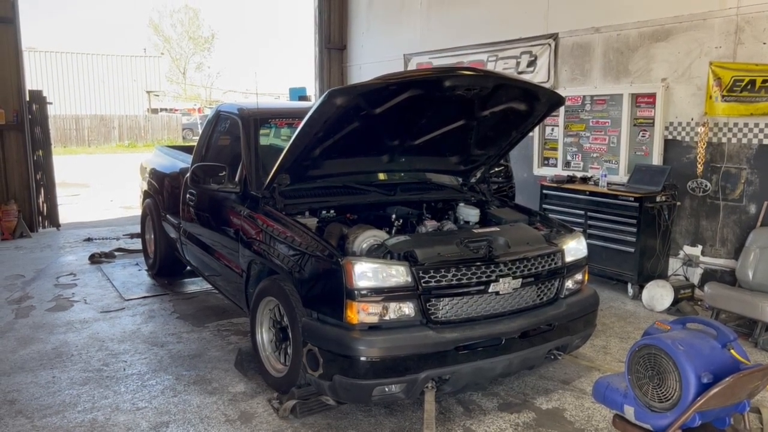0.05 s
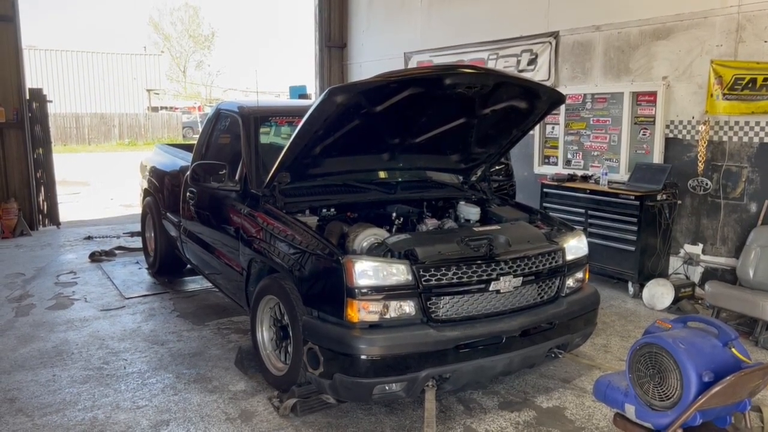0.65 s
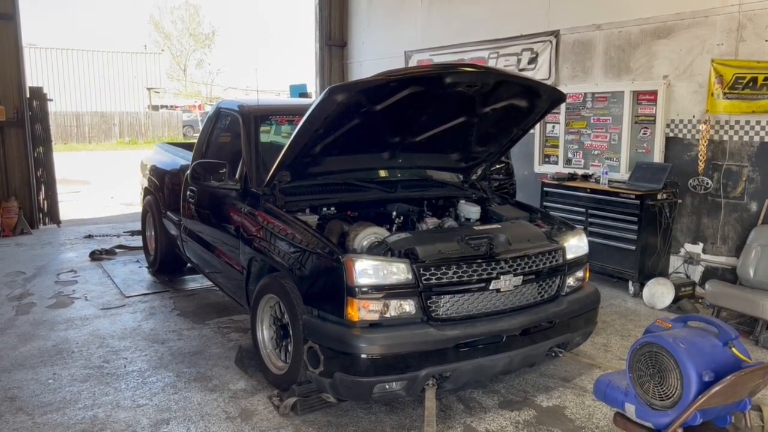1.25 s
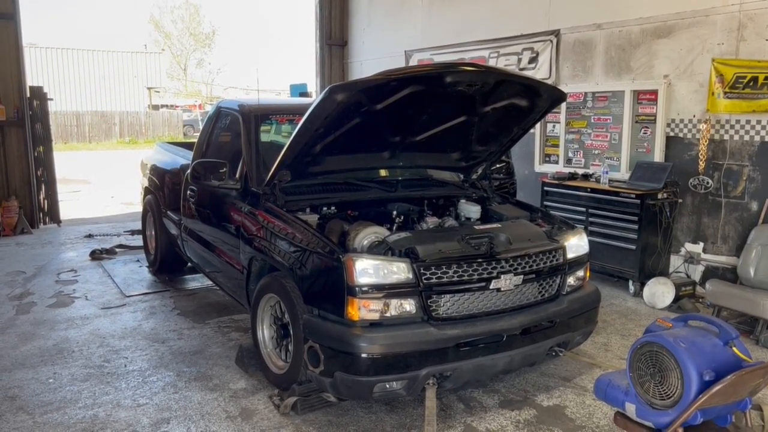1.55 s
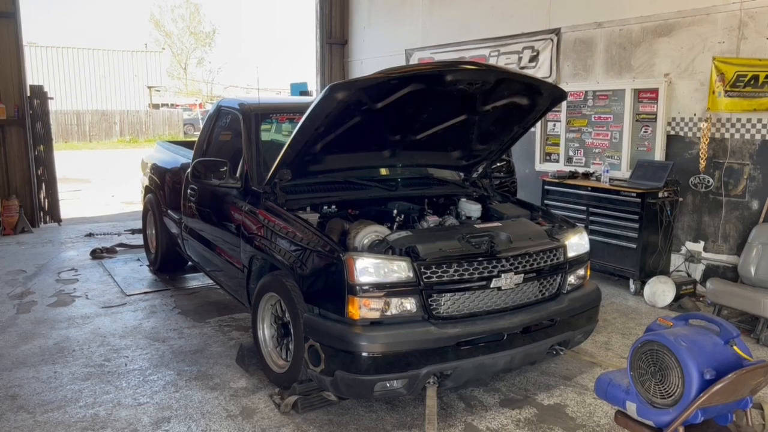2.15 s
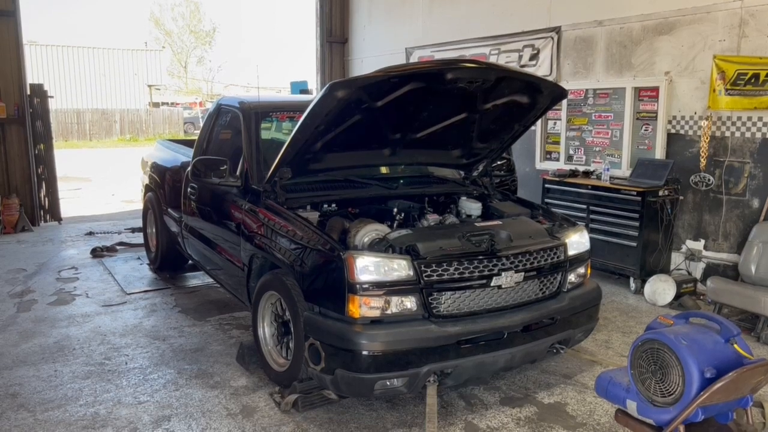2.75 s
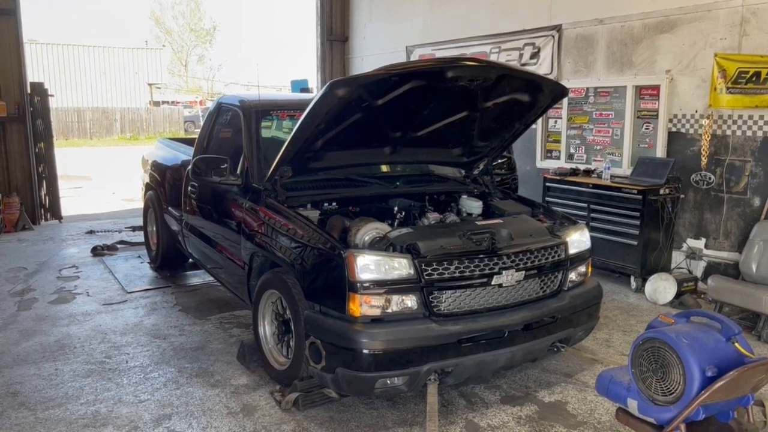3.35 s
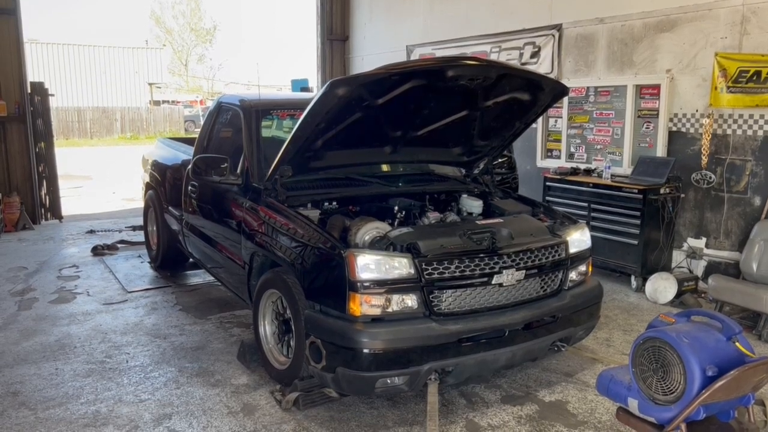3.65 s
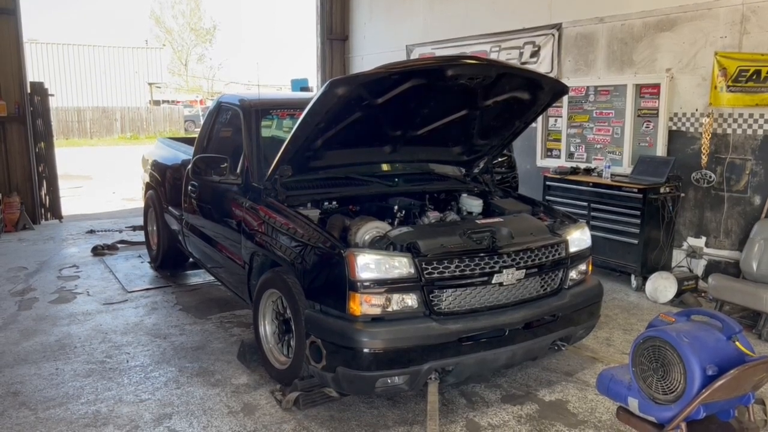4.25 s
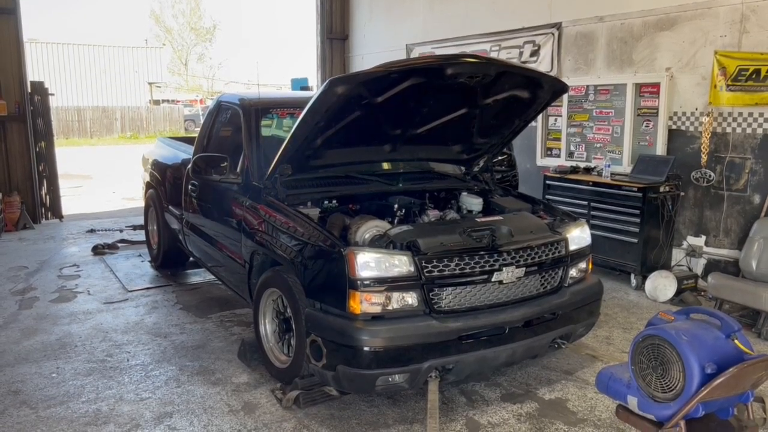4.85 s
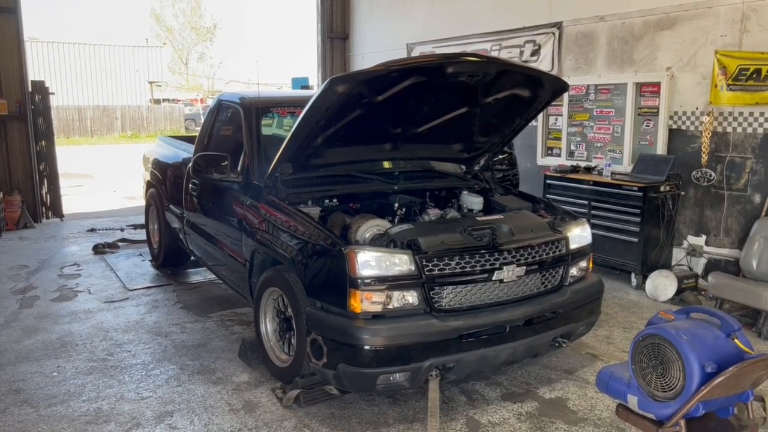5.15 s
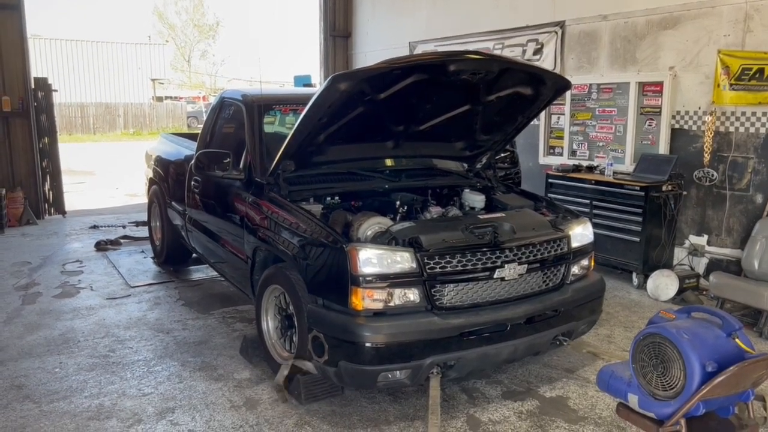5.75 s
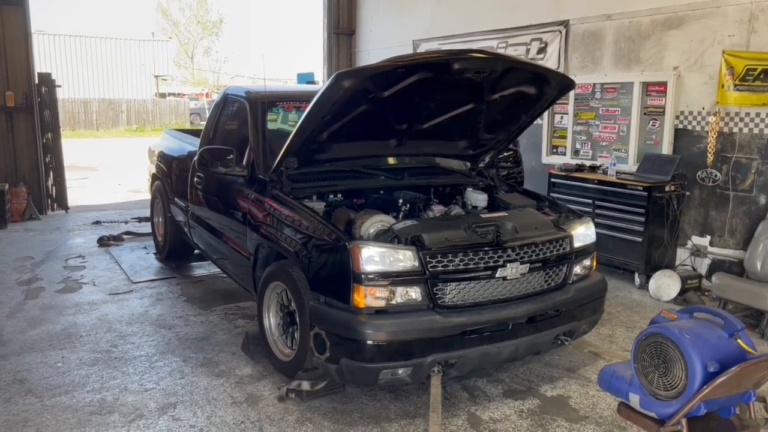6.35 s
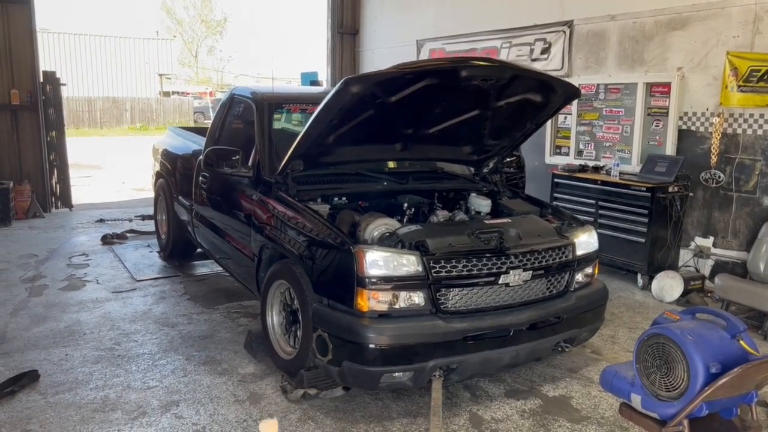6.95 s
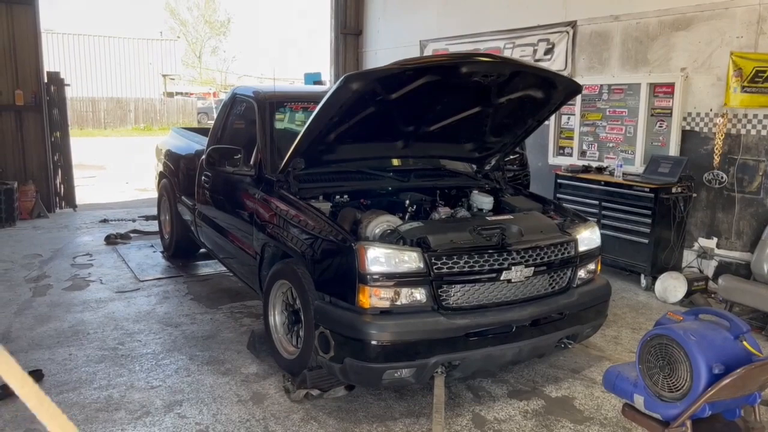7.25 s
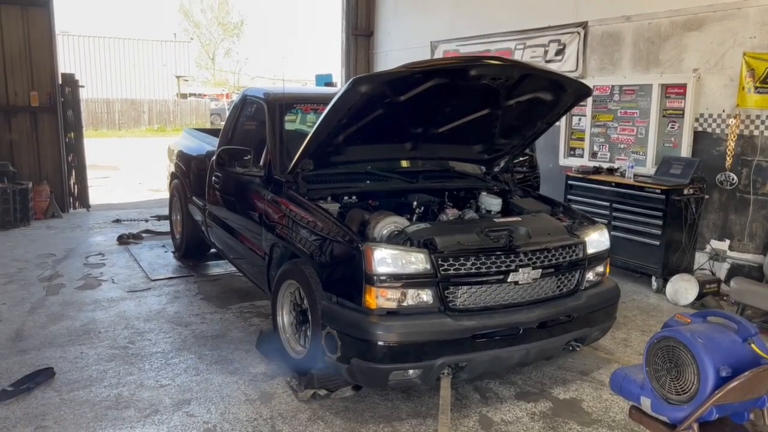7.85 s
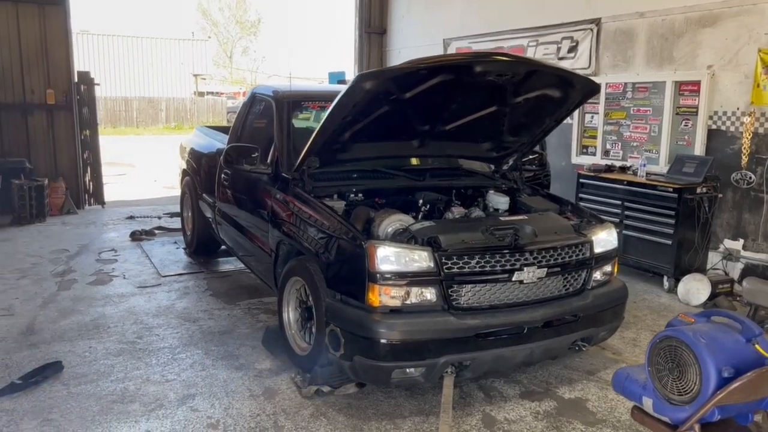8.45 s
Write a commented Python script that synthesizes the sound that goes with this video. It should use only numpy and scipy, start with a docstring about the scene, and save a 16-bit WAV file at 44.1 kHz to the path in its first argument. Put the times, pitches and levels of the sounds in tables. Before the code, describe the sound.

A turbocharged pickup engine pulls at full throttle in a workshop, heard from nearby. A metal panel chatters briefly as the exhaust booms and barks unevenly. The revs climb steadily with a metallic ticking and a rising turbo whistle, until a loud rush of air swamps the firing. The throttle lifts, the revs drop, the exhaust pops in a quick cluster and the engine coasts on more quietly.

```python
"""A turbocharged V8 pickup pulls at full throttle on the rollers of a workshop, bonnet open.
At first a metal panel chatters and the exhaust booms and barks unevenly. As the revs climb,
hard-firing cylinders set the manifold ticking and the turbo whistles higher. After 5 s it reaches
full boost, the wastegate (its relief valve) is open and rushing air swamps the firing. At 6.6 s the
throttle lifts and the revs drop; unburnt fuel pops in the exhaust, and the engine coasts on."""
import sys
import numpy as np
from scipy import signal
from scipy.fft import rfft, irfft, next_fast_len
from scipy.io import wavfile
from scipy.ndimage import uniform_filter1d, minimum_filter1d

SR = 44100
rng = np.random.default_rng(int(sys.argv[2]) if len(sys.argv) > 2 else 0)


def put_to_file(sound):
    """Save the sound as 16-bit audio at rate SR, in the file named by the first command-line argument."""
    columns = np.atleast_2d(sound).T  # one column per channel
    safe = np.clip(columns, -1, 1)
    whole_steps = np.round(safe * 32767)
    wavfile.write(sys.argv[1], SR, whole_steps.astype(np.int16))


N = 374409
TIME = np.arange(N) / SR
WASTEGATE_OPENS_S, WASTEGATE_TRAVEL_S = 5.1, 0.164
LIFT_S, THROTTLE_CLOSES_S = 6.57, 0.093
MID_PULL_CYCLES_PER_S, MID_TURBO_HZ = 30, 5000   # in one cycle, every cylinder fires once


def from_db(db):
    """Turn decibels into a gain."""
    return np.exp(np.asarray(db) * (np.log(10) / 20))

def rms_one(x):
    """Scale a signal to an average power of 1."""
    return x / np.sqrt(np.mean(x ** 2) + 1e-20)

def in_time(rows):
    """Turn a table that starts with seconds into one curve per other column."""
    seconds, *columns = np.transpose(rows)
    return [np.interp(TIME, seconds, column) for column in columns]

def at_hz(points, hz):
    """Read a table of frequencies between its rows, on a scale of octaves."""
    known, values = np.transpose(points)
    return np.interp(np.log(np.maximum(hz, 1)), np.log(known), values)

def drift(rate, seconds=TIME):
    """Wander at random around 0, reaching `rate` new values a second."""
    knots = rng.standard_normal(1500)
    return np.interp(seconds * rate, np.arange(len(knots)), knots)

def ramp(start_s, length_s):
    """Go from 0 to 1 and stay there."""
    return np.clip((TIME - start_s) / length_s, 0, 1)

def wave(turns):
    """A cosine with one swing per turn."""
    return np.cos((2 * np.pi * (turns - np.floor(turns))).astype(np.float32))

def colour(x, spectrum):
    """Make each frequency louder or softer as a table says."""
    size = next_fast_len(N + 4096, True)
    gains = from_db(at_hz(spectrum, np.fft.rfftfreq(size, 1 / SR)))
    return irfft(rfft(x, size) * gains, size)[..., :N]

def band(x, low_hz, high_hz):
    """Keep the sound between two frequencies."""
    return signal.sosfilt(signal.butter(4, [low_hz, high_hz], "band", fs=SR, output="sos"), x + 1e-18)

def resonance(x, hz, width_hz):
    """Ring at one pitch; the narrower the width, the longer the ring."""
    r = np.exp(-np.pi * width_hz / SR)
    feedback = [1, -2 * r * np.cos(2 * np.pi * hz / SR), r * r]
    return signal.lfilter(np.array([1, 0, -1]) * (1 - r * r) / 2, feedback, x + 1e-18)

def ringing(x, notes):
    """Ring at all the pitches in a table."""
    return sum(from_db(db) * resonance(x, hz, width) for hz, width, db in notes)

def response_db(broad, waves, hz):
    """A pipe's broad tone plus the peaks and dips of its standing waves."""
    grid = np.arange(20., 2800)
    ripple = sum(db * np.exp(-((grid - centre) / width) ** 2) for centre, width, db in waves)
    return np.interp(hz, grid, at_hz(broad, grid) + ripple)

def evened(x):
    """Even out the slow changes in a stereo sound's level."""
    power = uniform_filter1d(uniform_filter1d(x.mean(axis=0) ** 2, size=4400), size=3000)
    return x / np.sqrt(np.maximum(power, 1e-12))

def panned(left_db):
    """Two gains that make the left side `left_db` louder than the right."""
    return from_db(left_db * np.array([[.5], [-.5]]))

def stereo(left, right, lag_s=0.00012):
    """Sound reaches the right side a little later."""
    return np.array([left, np.roll(right, round(lag_s * SR))])

# Each row: frequency in Hz, how alike left and right are from 0 to 1.
STEREO_LIKENESS = [(40, 0.19), (150, 0.18), (400, 0.081), (1000, 0.16), (2500, 0.81), (5000, 0.12),
                   (9000, 0.033), (14000, 0.091)]
def stereo_noise(spectrum):
    """Coloured noise, partly alike on the two sides."""
    mid = colour(rng.standard_normal(N), [(hz, 10 * np.log10(1 + c)) for hz, c in STEREO_LIKENESS])
    side = colour(rng.standard_normal(N), [(hz, 10 * np.log10(1 - c)) for hz, c in STEREO_LIKENESS])
    return rms_one(colour(stereo(mid + side, mid - side), spectrum))

def workshop(x, near_db, tail_db, tail_s=0.47):
    """The direct sound, quick echoes from bonnet and floor, and the hall's fading tail."""
    age = TIME[:SR // 2]
    near, tail = rng.standard_normal((2, 2, len(age)))
    near = near * np.exp(-age / 0.013) * (age > .0004)
    tail = tail * from_db(-60 * age / tail_s) * (age > .008)
    echoes = from_db(near_db) * near / np.linalg.norm(near[0])
    echoes += from_db(tail_db) * tail / np.linalg.norm(tail[0])
    return stereo(x, x) + signal.fftconvolve(x[None], echoes, axes=1)[:, :N]

def since_lift(after_s=0):
    """Seconds since the throttle lifted, counted from `after_s` later."""
    return np.maximum(TIME - LIFT_S - after_s, 0)

def released(release_s):
    """Share of the gas flow lost since the lift."""
    return 1 - np.exp(-since_lift() / release_s)

def engine_state():
    """How open the wastegate is, how closed the throttle, and a dip in dB until firing steadies."""
    opened = ramp(WASTEGATE_OPENS_S, WASTEGATE_TRAVEL_S)
    closed = ramp(LIFT_S, THROTTLE_CLOSES_S)
    return opened, closed, -6.5 * (1 - ramp(start_s=7, length_s=0.6))

# Each row: time in seconds, force of the exhaust pulses in dB.
PULSE_FORCE = [(0, -1.5), (1.3, 0.5), (1.75, 2), (2.0, 3.5), (2.3, 1.5), (3.0, 2), (3.6, 0), (4.2, -1),
               (4.7, 0.5), (5.2, 3), (5.42, 0.5), (5.56, -3), (6.0, -3), (6.55, -3)]
def effort_db():
    """How hard the engine pushes under throttle."""
    return in_time(PULSE_FORCE)[0]

# Each row: cylinder number, middle of its spell in seconds, half its width in seconds, extra dB.
HARD_FIRING = [(5, 1.75, .25, 5.5), (5, 2.55, .3, 7.5), (5, 3.35, .45, 6.5), (0, 3.65, .55, 6),
               (3, 4.7, .25, 7)]
def hard_firing_db(cylinder, seconds):
    """Extra force of a cylinder during a spell of hard firing."""
    return sum(db * (cylinder == round(which)) * np.exp(-((seconds - centre) / width) ** 2)
               for which, centre, width, db in HARD_FIRING)

# The cylinders in firing order. Each row: boom in dB, bark in dB, extra travel time in seconds.
FIRING_ORDER = [(7, 2, 0), (-37, -2.5, .0009), (5, -2.5, -.0007), (0.5, -1, .0013), (-11.5, -6, -.0004),
                (7, 3, .0002), (-7.5, -5.5, -.0012), (-2, -6, .0006)]
def firing_pulses(cycles, scatter_db=2.5, jitter_s=.00004):
    """One pulse per firing; each cylinder has its own strength and its own way to the outlet."""
    count = len(FIRING_ORDER)
    firing = np.arange(1, int(cycles[-1] * count))
    _, level_db, travel_s = np.array(FIRING_ORDER)[firing % count].T
    early_late, weak_strong = rng.standard_normal((len(firing), 2)).T
    seconds = np.interp(firing / count, cycles, TIME) + travel_s + jitter_s * early_late
    level_db = level_db + hard_firing_db(firing % count, seconds) + scatter_db * weak_strong
    pulses = np.zeros(N)
    pulses[np.clip(seconds * SR, 0, N - 1).astype(int)] = from_db(level_db)
    return pulses

def gas_bursts(cycles, decay_cycles):
    """Gas bursts out as each valve opens and fades until the next."""
    count = len(FIRING_ORDER)
    firing = np.floor(cycles * count).astype(int)
    cylinder = firing % count
    strength = from_db(np.array(FIRING_ORDER)[cylinder, 1] + hard_firing_db(cylinder, TIME))
    return rms_one(strength * np.exp(-(cycles - firing / count) / decay_cycles))

# Each row: frequency in Hz, level of the rumble in dB.
RUMBLE_TONE = [(20, -8), (40, 17), (70, -3), (200, -11), (800, -53)]
def workshop_rumble(level_db=-56.5):
    """The hall's steady low background."""
    return from_db(level_db) * stereo_noise(RUMBLE_TONE)

# The engine bay's notes. Each row: pitch in Hz, width in Hz, level in dB.
BAY_NOTES = [(820, 93, -0.5), (1000, 35, -10), (1367, 37, 1.5), (2120, 67, -1.5), (2244, 55, 3),
             (4300, 680, -9.5), (5500, 100, -9.5)]
# Each row: time in seconds, level of the clatter in dB.
CLATTER_LEVEL = [(0, -65), (1, -43), (2, -63), (6.7, -41.5), (7.2, -38), (7.6, -39.5), (8.49, -39)]
def valve_clatter(cycles):
    """Ticking valves make the engine bay ring, clearest when the exhaust is quiet."""
    ticks = workshop(firing_pulses(cycles, scatter_db=1.0, jitter_s=.00005), near_db=-5, tail_db=9)
    rings = sum(from_db(db) * resonance(resonance(ticks, hz, 2 * width), hz, 2 * width)
                for hz, width, db in BAY_NOTES)
    return from_db(in_time(CLATTER_LEVEL)[0]) * evened(rings)

# The panel's notes. Each row: pitch in Hz, width in Hz, level in dB.
PANEL_NOTES = [(870, 26, 2), (2090, 84, -18)]
def panel_chatter(cycles, level_db=-27, place_in_cycle=0.23):
    """Sheet metal chatters once per cycle at the low revs of the start, then fades."""
    count = np.floor(cycles - place_in_cycle)
    rubs = np.diff(count, prepend=count[0]) * from_db(drift(20))
    ring = ringing(rubs, PANEL_NOTES)
    return rms_one(stereo(ring, ring)) * from_db(level_db) * (1 - ramp(start_s=0.52, length_s=0.33))

# The manifold's notes. Each row: pitch in Hz, width in Hz, level in dB.
MANIFOLD_NOTES = [(2778, 174, 5), (2960, 57, 1)]
# Each row: time in seconds, level of the ticking under throttle in dB.
TICK_LEVEL = [(0, -54), (.8, -48.5), (1.6, -34.5), (2.3, -40), (2.8, -33.5), (3.3, -33), (4.3, -38.5),
              (4.8, -35.5), (5.2, -38), (5.6, -45), (6.5, -37.5)]
def manifold_tick(cycles, uneven_db=1.2, lift_loss_db=15):
    """The hardest firings knock the manifold, the metal pipes that collect the exhaust."""
    force = gas_bursts(cycles, decay_cycles=0.096) ** 0.88 * from_db(uneven_db * drift(45))
    knocks = force * rng.standard_normal((2, N))
    ring = evened(band(ringing(knocks, MANIFOLD_NOTES), 2640, 3480))
    return ring * from_db(in_time(TICK_LEVEL)[0] - lift_loss_db * released(0.21))

# Each row: start in seconds, level of the thud in dB, level of the crack in dB.
FUEL_POPS = [(6.953, -21, -31), (7.009, -12, -21), (7.036, -22, -29), (7.055, -14, -25), (7.076, -18, -24),
             (7.093, -21, -35), (7.109, -20, -23), (7.128, -21, -35), (7.143, -18, -35), (7.152, -30, -26),
             (7.291, -26, -24), (7.299, -22, -27)]
def exhaust_pops(thud_hz=265, thud_s=0.0085, crack_hz=1000, crack_width_hz=600, crack_s=0.0038):
    """Unburnt fuel goes off in the pipe after the lift: each pop is a short thud with a crack."""
    thuds, cracks = np.zeros((2, N))
    for start, thud_db, crack_db in FUEL_POPS:
        age = np.maximum(TIME - start, 0)
        thuds -= from_db(thud_db) * np.exp(-age / thud_s) * np.sin(2 * np.pi * thud_hz * age)
        cracks += from_db(crack_db) * np.exp(-age / crack_s) * (TIME >= start)
    gas = resonance(rng.standard_normal(N), crack_hz, crack_width_hz)
    gas = rms_one(resonance(gas, crack_hz, crack_width_hz))
    return workshop(thuds + cracks * gas, near_db=-11, tail_db=-4)

# Each row: time in seconds, pitch of the turbo's blades under throttle in Hz.
TURBO_PITCH = [(0, 1970), (1.2, 2825), (2, 3940), (2.6, 4190), (3.2, 4480), (3.7, 4770), (4.1, 5370),
               (4.5, 6470), (4.7, 7040), (5, 8430), (5.2, 9190), (5.35, 9550), (6, 9600), (6.6, 9500)]
def turbo_hz(slowing_s=0.28):
    """The turbo speeds up under throttle, runs on briefly after the lift, then drag slows it."""
    return in_time(TURBO_PITCH)[0] * (1 + since_lift(after_s=.055) / slowing_s) ** -.48

def turbo_breath(level_db=-46, width_hz=200, patchy_db=2.5, lift_loss_db=10):
    """A narrow band of air noise follows the blades' pitch, stronger when the turbo is slow."""
    hz = turbo_hz()
    noise = rng.standard_normal((2, N)) + 1j * rng.standard_normal((2, N))
    eddies = signal.sosfilt(signal.butter(2, width_hz, fs=SR, output="sos"), noise)
    air = rms_one((eddies * np.exp(2j * np.pi * np.cumsum(hz) / SR)).real)   # moved up to the pitch
    slow_db = -6 * np.minimum(np.log2(hz / MID_TURBO_HZ), 0)
    return air * from_db(level_db + patchy_db * drift(8) + slow_db - lift_loss_db * released(.5))

# How well the intake pipe carries the whistle. Each row: pitch in Hz, level in dB.
WHISTLE_LEVEL = [(4000, -76), (5100, -53), (5900, -47), (6400, -42), (7100, -41), (7500, -40.5),
                 (8100, -33), (8750, -41.5), (9100, -38.5), (9450, -56)]
def turbo_whistle(pure_hz=7800, least_waver=0.0022, most_waver=.05, lift_loss_db=36):
    """The blades' tone is breathy at low speed and purer when fast; the open wastegate shakes it."""
    hz = turbo_hz()
    opened, closed, _ = engine_state()
    waver = np.clip(least_waver * (pure_hz / hz) ** 4.6, least_waver, most_waver)
    waver += 0.006 * opened * (1 - closed)
    wavering_hz = hz * (1 + waver * drift(170) + waver * drift(40))
    tone = np.sqrt(2) * np.sin(2 * np.pi * np.cumsum(wavering_hz) / SR)
    gain = from_db(at_hz(WHISTLE_LEVEL, hz) - lift_loss_db * released(0.83))
    return workshop(tone * gain, near_db=6, tail_db=7.5)

def flow_gain(level_db, effort, octave_db, wastegate_db, lift_loss_db, release_s):
    """Loudness of moving gas: it follows effort, turbo pitch, wastegate and throttle."""
    opened, _, _ = engine_state()
    driven_db = effort * effort_db() + octave_db * np.log2(turbo_hz() / MID_TURBO_HZ)
    return from_db(level_db + driven_db + wastegate_db * opened - lift_loss_db * released(release_s))

# The gas flow, shared with the jet and the exhaust. Each row: time in seconds, roughness of
# the exhaust from 0 to 1, gain of the highest hiss in dB, the hiss's lean to the left in dB.
GAS_FLOW = [(0, 0.83, -21.5, 0), (1.5, 0.3, -15, 2.5), (3, 0.3, -18, 1), (4.4, 0.41, -14.5, 1.5),
            (5, 0.55, -14.5, 3), (5.5, 1, -17, 3.5), (6.55, 0.68, -19.5, 2.5), (6.8, 0.84, -11, 2),
            (7.15, 0.7, -13.5, 3), (7.5, 0.06, -27, 1), (8.49, 0.17, -19, 1)]
# Intake hiss, with a gap near 10 kHz from audio compression, not from the engine.
# Each row: frequency in Hz, level in dB.
HISS_WITH_GAP = [(2500, -2), (3100, 4.5), (3600, 3), (3950, 2.5), (4650, 0.5), (5400, 3), (6050, 0.5),
                 (6900, 1.5), (7600, -1.5), (8100, 2.5), (9200, 0.5), (10400, -7.5), (12000, 13),
                 (16000, -7)]
def air_rush(cycles, throb=0.34, flutter_db=1.5):
    """The intake and wastegate hiss, throbbing slightly with the firing."""
    _, top_db, left_db = in_time(GAS_FLOW)
    hiss = stereo_noise(HISS_WITH_GAP)
    body = band(hiss, 3030, 8360)
    top = from_db(top_db + 2.7 * drift(30)) * band(hiss, 9200, 20600)
    air = (body + top) / np.std(body)
    pulsing = rms_one(1 + throb * gas_bursts(cycles, decay_cycles=0.18))
    gain = flow_gain(-30.5, effort=0.29, octave_db=4.5, wastegate_db=-1, lift_loss_db=27.5, release_s=3.5)
    return air * pulsing * gain * from_db(flutter_db * drift(40)) * panned(left_db)

# Broad wastegate rush, with a gap near 10 kHz from audio compression, not from the jet.
# Each row: frequency in Hz, level in dB.
JET_WITH_GAP = [(500, -30), (1000, -14), (1500, -1.5), (2500, 1), (3500, -3), (5000, -7.5), (6500, -7),
                (9000, -25), (10400, -42), (16000, -13.5)]
def wastegate_jet(level_db=-23.5, flutter_db=2):
    """Spare exhaust escapes through the wastegate as a broad, smooth jet."""
    _, _, left_db = in_time(GAS_FLOW)
    flow = ramp(start_s=4.61, length_s=0.83) * (1 - released(0.18))
    gain = from_db(level_db + effort_db() + flutter_db * drift(40))
    return flow * gain * stereo_noise(JET_WITH_GAP) * panned(left_db)

# Each row: time in seconds, level of the roar in dB.
ROAR_LEVEL = [(0, -33), (1.2, -31.5), (2.1, -29.5), (2.4, -31), (4.05, -32.5), (4.65, -25.5), (5.15, -23),
              (5.55, -29), (6.4, -26.5), (6.8, -32), (7.05, -30.5), (7.4, -44), (8.49, -43.5)]
# Each row: frequency in Hz, level of the roar in dB.
ROAR_TONE = [(25, -44), (45, -14), (80, -10.5), (150, -7.5), (280, -7.5), (420, -6.5), (560, -10),
             (700, -27), (1000, -51.5)]
def tailpipe_roar(flutter_db=4):
    """Swirling gas leaves the tailpipe with a lumpy roar."""
    return from_db(in_time(ROAR_LEVEL)[0] + flutter_db * drift(30)) * stereo_noise(ROAR_TONE)

def firing_phase(multiple, hz):
    """Where a harmonic starts its swing, set by the cylinders' strengths and travel times."""
    _, level_db, travel_s = np.transpose(FIRING_ORDER)
    places = np.arange(len(FIRING_ORDER)) / len(FIRING_ORDER)
    return np.angle(np.sum(from_db(level_db) * np.exp(-2j * np.pi * (multiple * places + hz * travel_s))))

# Lean to the left. Each row: time in seconds, dB for the boom, dB for the bark and growl.
EXHAUST_LEAN = [(0, -0.5, -4.5), (2, 0.5, -2.5), (4.3, 0.5, -4.5), (4.8, 1, -2.5), (5.3, 19.5, -1),
                (5.8, 22, -1), (6.5, 16, -0.5), (7.1, -1, -7.5), (8.49, 1.8, -2.5)]
# The downpipe, just after the turbo. Each row: frequency in Hz, gain in dB.
DOWNPIPE_TONE = [(300.0, 2), (400.0, -3.5), (480.0, -5.5), (600.0, -17), (750.0, 1), (880.0, 1),
                 (1050.0, 0.5), (1200.0, -10.5), (1400.0, -17.5), (1700.0, -19), (2100.0, -14), (2600.0, 5)]
# Peaks and dips of downpipe and hall. Each row: frequency in Hz, half width in Hz, gain in dB.
DOWNPIPE_PEAKS = [(428, 8.4, -18), (438, 4, 6), (456, 4, -9), (466.0, 3.3, 3.5), (479, 3.1, -5),
                  (506.6, 6, 10), (503, 3.1, -14), (523, 2.8, -15.0), (531.0, 5.6, 6), (546, 12, -12),
                  (597.5, 7, 6.5), (624, 4, 10.5), (670, 3.1, 7), (660.5, 6.2, 3.5), (692, 8.3, -6.5),
                  (787.4, 7.8, -7.5), (826, 11.4, -11), (845, 8.7, -6), (893, 5.1, -4.5), (1004, 16, -2.5),
                  (1047, 12, 3), (1070, 7, 1), (1120, 11, 4.5), (1146, 7, -13), (1208, 11, -3),
                  (1233, 12, 5), (1245, 19, 10), (1370, 12, -10.0), (1390, 12, -3), (1470, 18.3, -16),
                  (1470, 24, -9.0), (1880, 20, 10), (1900, 20, 1), (2114, 18, 13), (2190, 19, 16),
                  (2247, 17, 17), (2440, 20, -15.0)]
# Each row: multiple of the cycle rate, then dB when pulling, with the wastegate open and coasting.
GROWL_HARMONICS = [(15.0, -37.5, -40.0, -44), (16.0, -34, -39, -50.5), (17.0, -35.5, -34, -60),
                   (18.0, -37.5, -38, -39.5), (19.0, -31, -38, -54), (20.0, -41, -34.5, -55),
                   (21.0, -36.5, -35, -44.5), (22.0, -34.5, -41.5, -51), (23.0, -39, -35.5, -59),
                   (24.0, -39, -46, -51), (25.0, -36, -47, -50), (26.0, -42.5, -43.5, -41.5),
                   (27.0, -36.5, -38.5, -51), (28.0, -45.5, -39, -41), (29.0, -38.5, -38, -43),
                   (30.0, -37, -26, -44), (31.0, -43, -47.0, -53), (32.0, -40, -35.0, -43),
                   (33.0, -38, -57.0, -43), (34.0, -44.0, -49, -56.5), (35.0, -42.5, -49, -50),
                   (36.0, -42.5, -51.5, -50.0), (37.0, -45.5, -41, -52), (38.0, -38, -45.0, -49),
                   (39.0, -46, -51, -51.0), (40.0, -47, -52, -49.5), (41.0, -42.0, -52.5, -57),
                   (42.0, -44.5, -37, -50.0), (43.0, -46, -35.5, -42), (44.0, -45, -44.5, -53),
                   (45.0, -40, -40, -38)]
def exhaust_growl(speed, cycles, level_db=.8, swell_db=1.5, flutter_db=2.2, waver=0.13):
    """High harmonics swell and fade as they climb through the downpipe's standing waves."""
    step = 64   # samples between level updates
    opened, closed, misfire_db = (curve[::step] for curve in engine_state())
    seconds, speed, push_db = TIME[::step], speed[::step], 1.43 * effort_db()[::step]
    growl = np.zeros(N)
    for multiple, load_db, open_db, coast_db in GROWL_HARMONICS:
        pulling_db = level_db + (1 - opened) * load_db + opened * open_db + push_db
        db = (1 - closed) * pulling_db + closed * (coast_db + misfire_db)
        db += response_db(DOWNPIPE_TONE, DOWNPIPE_PEAKS, multiple * speed)
        db += swell_db * (1 + closed / 2) * drift(4, seconds)
        db += flutter_db * drift(22, seconds)   # uneven firing breaks up the tone
        phase = firing_phase(multiple, multiple * MID_PULL_CYCLES_PER_S) + 0.61 * rng.standard_normal()
        growl += np.repeat(from_db(db), step)[:N] * wave(multiple * cycles + phase / (2 * np.pi))
    return np.sqrt(2) * stereo(growl, growl) * (1 + waver * drift(14)) * panned(in_time(EXHAUST_LEAN)[1])

# Each row: frequency in Hz, level of the bark in dB.
BARK_TONE = [(260, -31), (450, -32), (600, -4.5), (750, -1), (900, -1), (1080, -3.5), (1200, -1.5),
             (1450, -8), (1600, -12), (1750, -4.5), (2030, -6.5), (2350, -14), (2800, -7), (3150, -8),
             (3700, -20), (5200, -37)]
# The exhaust pipe's notes. Each row: pitch in Hz, width in Hz, level in dB.
PIPE_NOTES = [(1600, 27, 0.5), (2077, 150, -5.5)]
# Each row: frequency in Hz, the bark's lean to the left in dB.
BARK_SIDES = [(450, 5), (700, 4), (1290, 3.5), (2380, -4), (3400, 0)]
def exhaust_bark(cycles, split_hz=1400, steady_gas=1.2):
    """Each firing sends out a sharp crack and a puff of gas that ring the pipe and the manifold."""
    rough = np.clip(in_time(GAS_FLOW)[0], .02, .98)
    cracks = rms_one(workshop(colour(firing_pulses(cycles), BARK_TONE), near_db=-1, tail_db=-1))
    puffs = stereo_noise(BARK_TONE) * rms_one(steady_gas + gas_bursts(cycles, decay_cycles=.055))
    gas = np.sqrt(1 - rough) * cracks + np.sqrt(rough) * puffs
    bark = evened(band(puffs, 510, split_hz))
    bark *= flow_gain(-32, effort=1.05, octave_db=1, wastegate_db=5.5, lift_loss_db=20, release_s=0.45)
    rasp = evened(band(gas + ringing(gas, PIPE_NOTES), split_hz, 2515))
    rasp *= flow_gain(-30, effort=0.97, octave_db=4, wastegate_db=-4, lift_loss_db=7, release_s=0.05)
    sides = [colour(side, [(hz, sign * db / 2) for hz, db in BARK_SIDES])
             for side, sign in zip(bark + rasp + manifold_tick(cycles), (1, -1))]
    return np.array(sides) * panned(in_time(EXHAUST_LEAN)[1])

# The exhaust pipe. Each row: frequency in Hz, gain in dB.
PIPE_TONE = [(40.0, -44.5), (60.0, -27), (80.0, -14), (110.0, -4), (160.0, -11.5), (240.0, -4),
             (285.0, 4.5), (350.0, 5), (450.0, -10), (600.0, -15), (800.0, 1)]
# Peaks and dips of pipe and hall. Each row: frequency in Hz, half width in Hz, gain in dB.
PIPE_PEAKS = [(65, 3, -1.5), (78.4, 3, 3.0), (91.4, 1.7, -6), (100.0, 3.6, -3.5), (126.3, 2.6, -5.5),
              (143.94, 1.6, -18), (151.0, 3.5, -7), (165, 2.5, 4.5), (176.5, 2.8, -9.5), (205.3, 5.3, 4.5),
              (227.7, 3.7, 4.0), (256.7, 4.5, -3), (279.7, 2.6, 2), (289.2, 2.5, -4.0), (413, 6.18, 1),
              (465, 3, 10), (499.5, 11, 9.5), (539, 8.1, 11), (592, 5.3, 5.5), (724.0, 10, -13)]
# Each row: multiple of the cycle rate, dB when pulling, dB added to that per doubling of speed,
# dB with the wastegate open, dB when coasting.
BOOM_HARMONICS = [(2.0, -20, -12, -40, -35), (3.0, -10, -12, -30.5, -14), (4.0, -34.5, -2, -55.0, -53),
                  (5.0, -12, -5.5, -32, -25), (6.0, -28.5, -4, -43.5, -33.5), (7.0, -30.5, -13, -42.5, -47),
                  (8.0, -22, -5, -23, -31), (9.0, -33.5, -9, -53, -29.5), (10.0, -34.5, -21.5, -34, -38),
                  (11.0, -27, -7, -40, -39), (12.0, -43, 6, -42.0, -38.5), (13.0, -49.5, -50, -31.5, -30.5),
                  (14.0, -32, 5, -39, -40)]
def exhaust_boom(speed, cycles, delay_cycles=0.1517, right_lag_s=0.0002):
    """Uneven firing favours harmonics 3, 5, 8 and 11, which sweep through the pipe's peaks and dips."""
    opened, closed, misfire_db = engine_state()
    duck_db = -8 * np.exp(-((TIME - LIFT_S - .06) / .045) ** 2)   # a short dip as the revs fall
    push_db = 0.77 * effort_db() + duck_db
    waver = 0.049 + 0.34 * in_time(GAS_FLOW)[0] ** 2   # rougher flow, shakier level
    doublings = np.log2(speed / MID_PULL_CYCLES_PER_S)
    strengths = from_db(np.array(FIRING_ORDER)[:, 0])
    places = np.arange(len(strengths)) / len(strengths) + delay_cycles
    boom = np.zeros((2, N))
    for multiple, load_db, rise_db, open_db, coast_db in BOOM_HARMONICS:
        hz = multiple * speed
        pulling_db = (1 - opened) * (load_db + rise_db * doublings) + opened * open_db
        coasting_db = coast_db + misfire_db * (multiple != len(FIRING_ORDER))   # spares the firing rate
        db = (1 - closed) * pulling_db + closed * coasting_db
        db += push_db + response_db(PIPE_TONE, PIPE_PEAKS, hz)
        gain = np.sqrt(2) * from_db(db) * (1 + waver * drift(30))
        # the firing pattern sets how the harmonics line up
        phase = np.angle(-np.sum(strengths * np.exp(-2j * np.pi * multiple * places)))
        turns = multiple * cycles + phase / (2 * np.pi)
        boom += gain * np.array([wave(turns), wave(turns - hz * right_lag_s)])
    return boom * panned(in_time(EXHAUST_LEAN)[0])

# Each row: time in seconds, engine speed in cycles per second.
ENGINE_SPEED = [(0, 19.6), (.2, 20.8), (.6, 22.16), (1, 24.19), (1.2, 25.47), (1.4, 26.3), (2.2, 28.09),
                (2.8, 29.86), (3.2, 31.22), (3.8, 34.2), (4.2, 36.74), (4.6, 40.03), (4.8, 42.45),
                (5.2, 48.16), (5.6, 51.8), (6.58, 57.58), (6.7, 45.94), (6.85, 47.05), (7.2, 47.36),
                (7.4, 46.72), (8.49, 44.88)]
def scene():
    """Count the engine's cycles, then add up exhaust, air, rattles, pops and hall."""
    speed, = in_time(ENGINE_SPEED)
    cycles = np.cumsum(speed) / SR - .095
    valve_cycles = cycles + .03
    exhaust = exhaust_boom(speed, cycles) + exhaust_bark(valve_cycles)
    exhaust += exhaust_growl(speed, valve_cycles) + tailpipe_roar()
    air = air_rush(valve_cycles) + turbo_whistle() + turbo_breath() + wastegate_jet()
    rattles = valve_clatter(valve_cycles) + panel_chatter(valve_cycles)
    return exhaust + air + rattles + exhaust_pops() + workshop_rumble()

def record(dry):
    """Turn the highest peaks down quickly and cut the treble above 16000 Hz."""
    needed_gain = .9 / np.maximum(np.abs(dry).max(axis=0), .9)
    gain = uniform_filter1d(minimum_filter1d(needed_gain, size=201), size=201)
    return signal.sosfilt(signal.ellip(10, .1, 80, 16000, fs=SR, output="sos"), dry * gain)


dry = scene()
out = record(dry)
put_to_file(out)
```